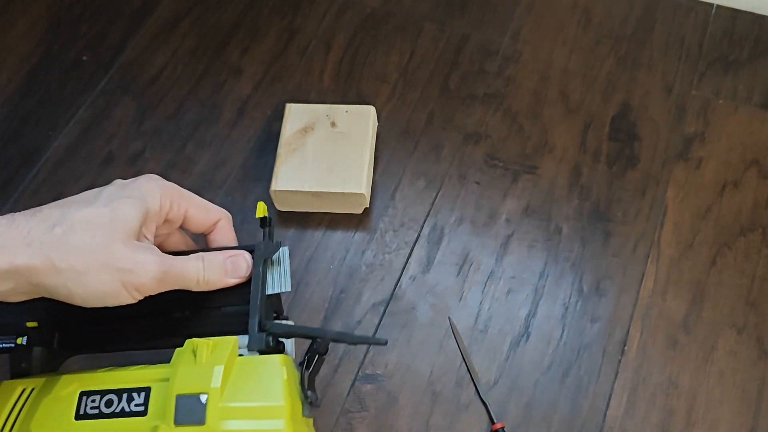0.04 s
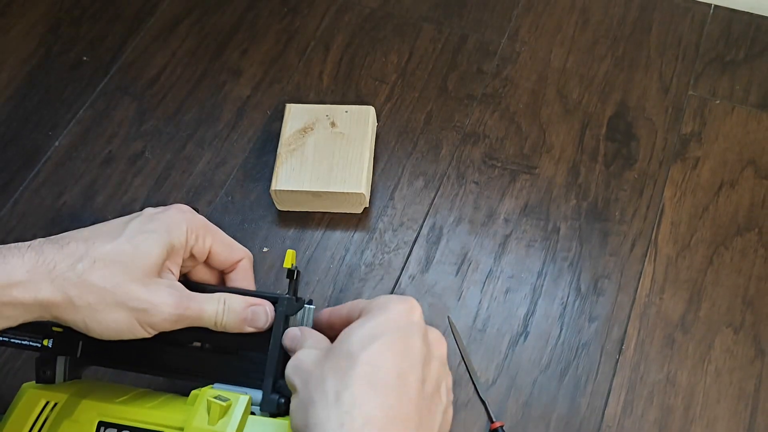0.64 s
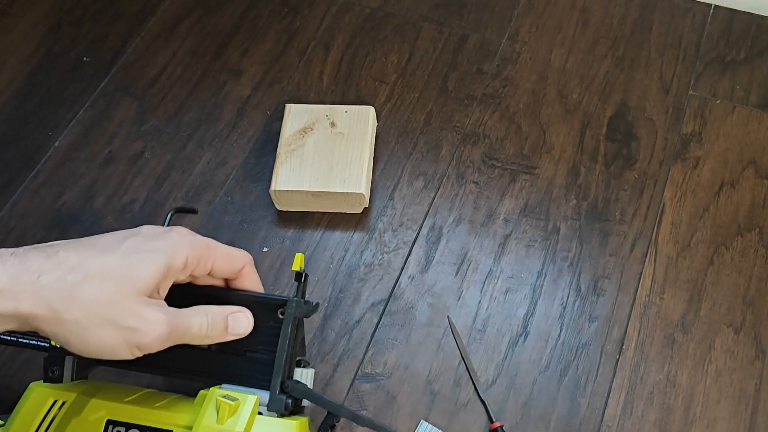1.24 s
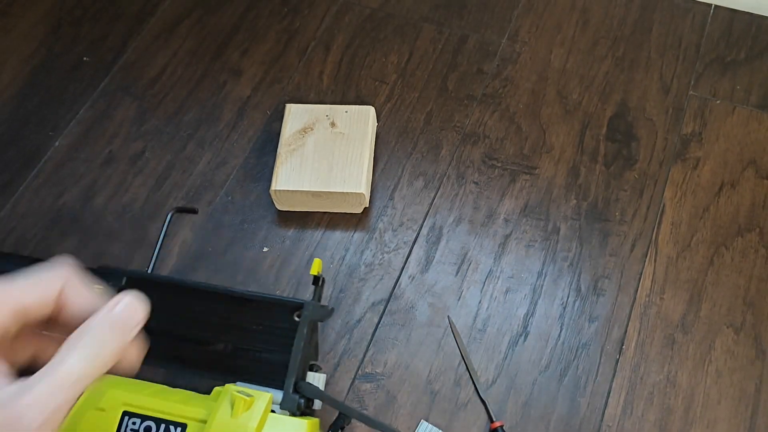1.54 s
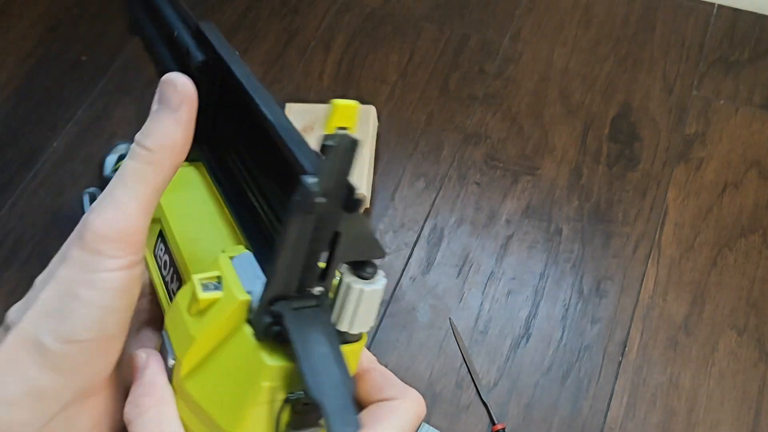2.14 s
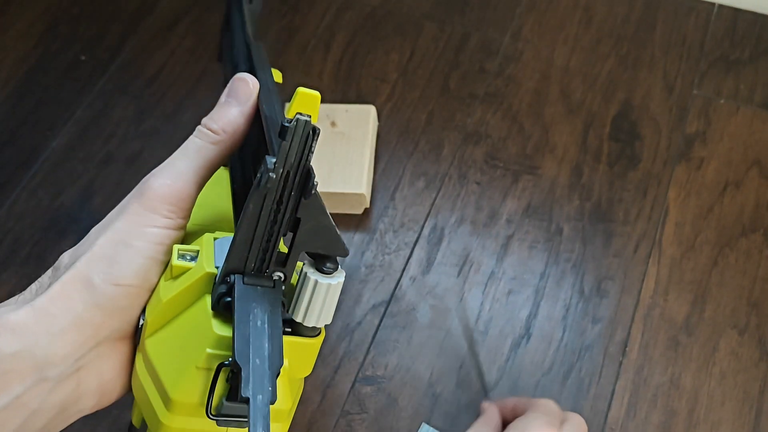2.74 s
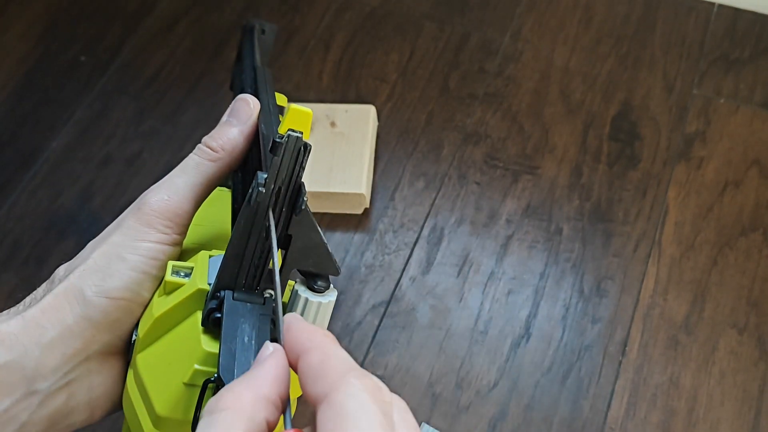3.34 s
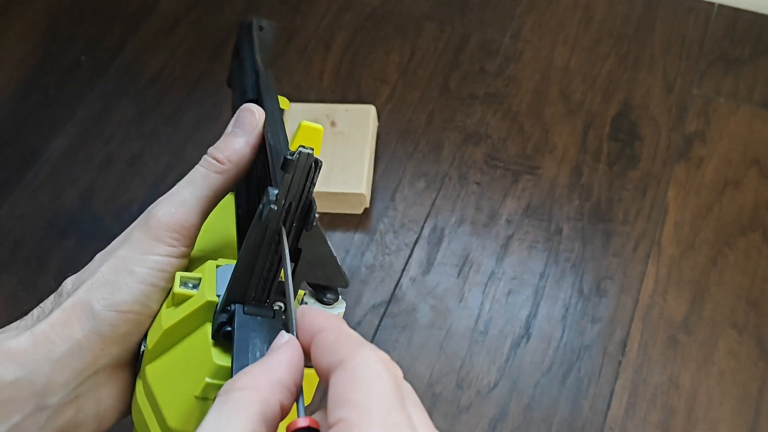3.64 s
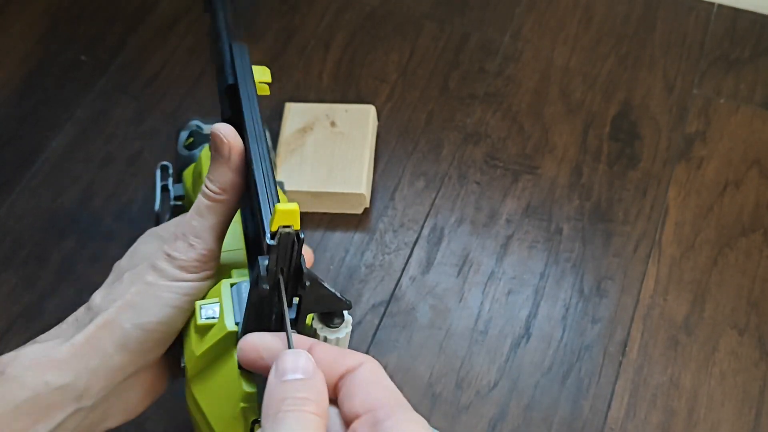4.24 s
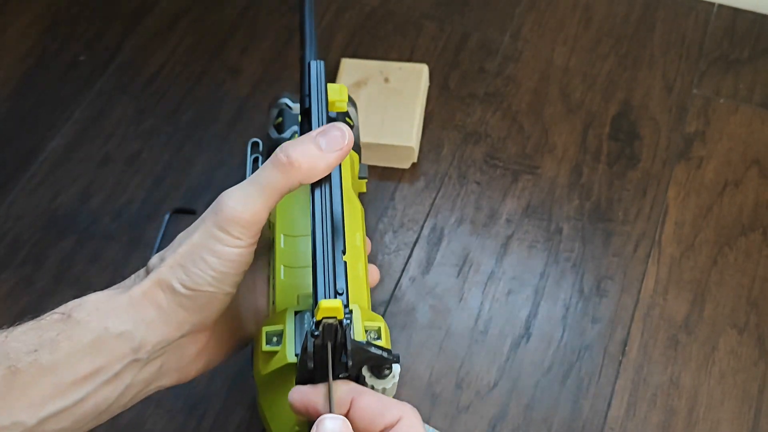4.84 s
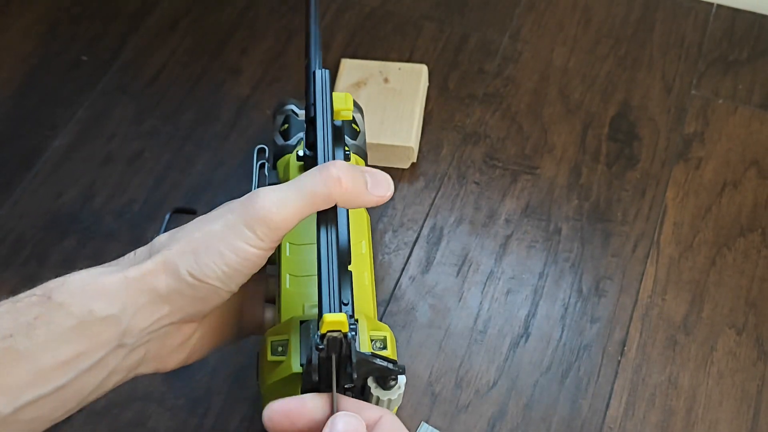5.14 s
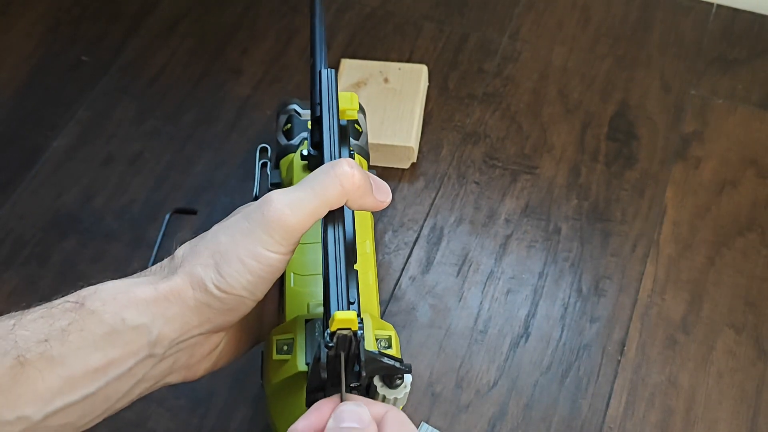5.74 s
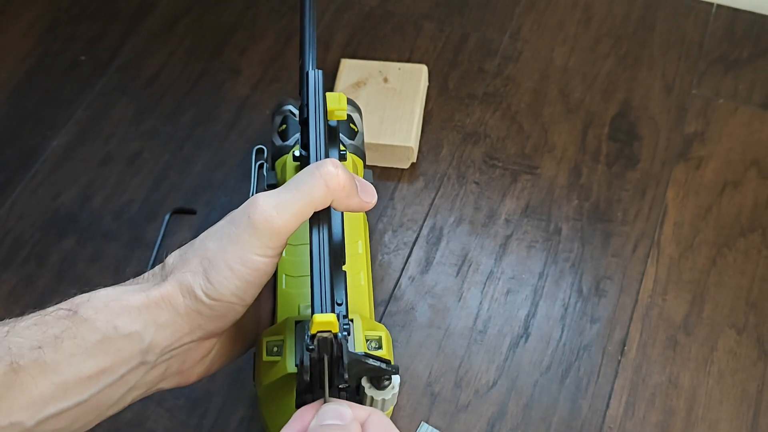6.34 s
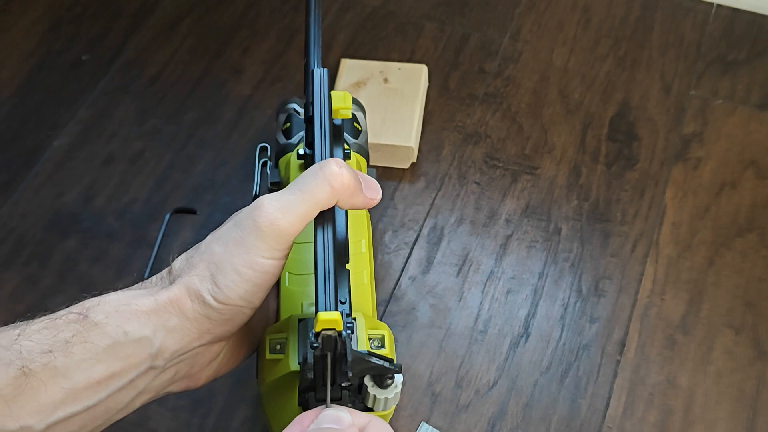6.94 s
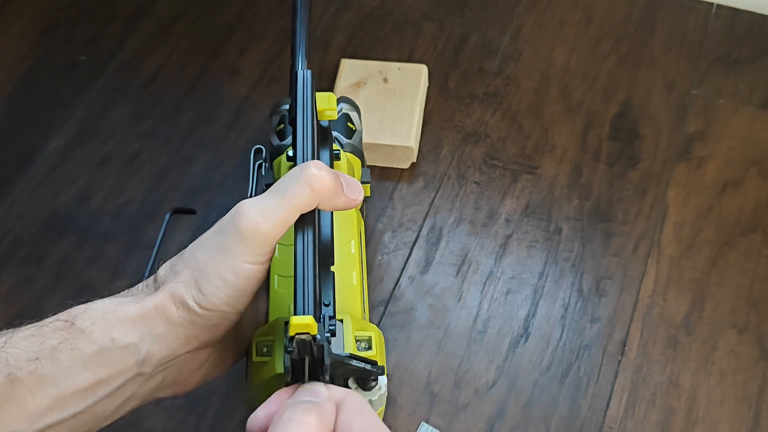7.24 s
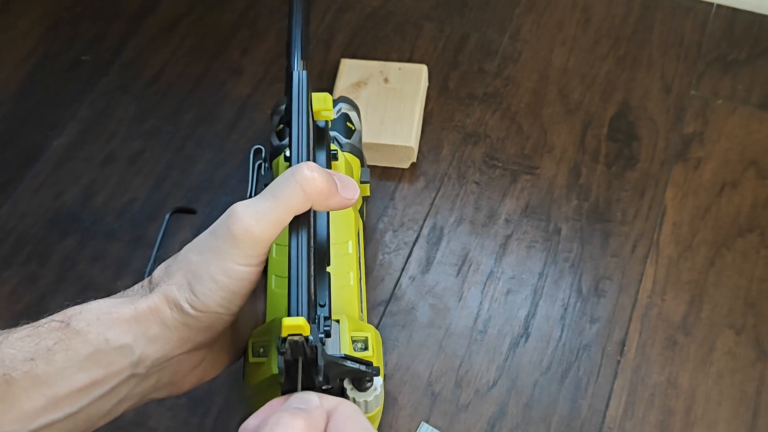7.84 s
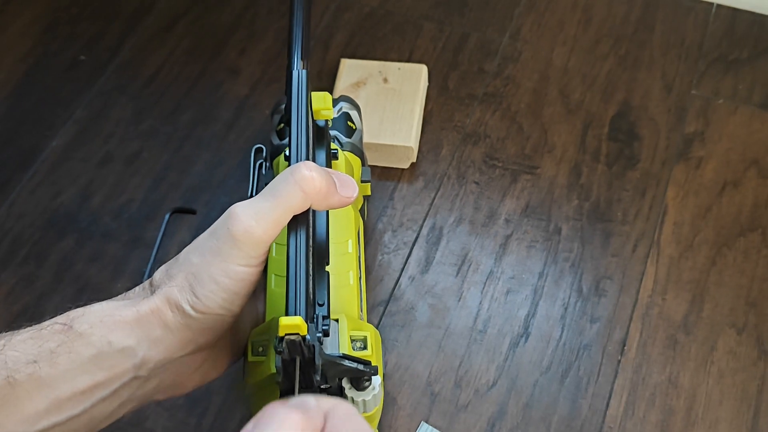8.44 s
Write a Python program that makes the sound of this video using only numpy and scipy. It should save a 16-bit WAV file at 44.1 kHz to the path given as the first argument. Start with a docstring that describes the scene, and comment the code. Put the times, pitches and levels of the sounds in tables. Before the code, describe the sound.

A nail gun is handled with thuds, clicks and sharp snaps, then a small metal file rasps inside it in quick strokes.

```python
"""A cordless nail gun handled on a wooden floor: hands slide on its shell, it bumps the boards,
parts click, the magazine latch snaps. A small metal file is picked up and rasps in the nose in
quick strokes that grow firmer; its teeth ring the steel and the push shakes the housing.
Close stereo microphone, quiet room, low hum."""
import sys
import numpy as np
from scipy import signal
from scipy.fft import rfft, irfft, next_fast_len
from scipy.io import wavfile

SR = 44100
rng = np.random.default_rng(int(sys.argv[2]) if len(sys.argv) > 2 else 0)


def output_pcm(signal):
    """Save a mono or channel-first signal as 16-bit PCM at the path in sys.argv[1].

    Samples are clipped to [-1, 1] before scaling.
    """
    pcm = np.clip(np.atleast_2d(signal).T, -1, 1) * 32767
    wavfile.write(sys.argv[1], SR, np.round(pcm).astype(np.int16))


N = 378241
TIME = np.arange(N) / SR

# machine hum: freq_hz, rms_db
HUM_TONES = [(58.2, -52), (99.7, -62.5), (176.5, -65.5)]
# rumble and hiss: freq_hz, gain_db
AMBIENT_SPECTRUM = [(20, -8.5), (38, -5.5), (70, -6), (110, -13), (250, -31), (850, -42), (1200, -49),
                    (4000, -50), (8000, -54.5), (16000, -54.5)]
# hands sliding on the shell: start_s, length_s, level_db, tilt_db_per_octave
HAND_RUBS = [(0, 0.19, -49, 4.5), (.16, .27, -50, 4), (.3, 0.11, -45.5, 2.5), (.6, 0.34, -52, 5),
             (1.37, 0.2, -42, 3), (1.8, 0.33, -56.5, 1.5), (2.15, .46, -54, 3.6), (4.36, 0.29, -46, 2.5),
             (4.63, 0.12, -47.5, 2)]
# skin friction: freq_hz, gain_db
SKIN_SPECTRUM = [(150, 0), (500, 5.5), (2000, -9), (4000, -7), (5400, -1), (8000, -24.5), (16000, -23.5)]
# plastic shell: freq_hz, gain_db
SHELL_MODES = [(560, 6), (740, 5), (960, 8), (1200, 6), (2200, 8), (2550, 5), (3750, 7)]
SHELL_WIDTH = .08  # share of centre frequency
# push of the hands on the gun: time_s, level_db
HAND_EFFORT = [(0, -67), (4.25, -58.5), (4.45, -46.5), (4.72, -43), (5.0, -96), (5.4, -62.5), (5.53, -45.5),
               (6.5, -46.5), (6.7, -39), (7.6, -39), (7.76, -33), (8.55, -34)]
# hand-held housing: freq_hz, gain_db
HOUSING_MODES = [(73.89, 0.5), (111.23, -2.5), (155, -3), (344.4, -8.5)]
# hard parts tapping the shell: start_s, level_db, centre_hz
PART_CLICKS = [(.398, -43.5, 3700), (.418, -47, 615), (.459, -39, 3560), (.484, -39, 4300),
               (.525, -48, 5400), (.769, -46.5, 4700), (.849, -38.5, 8600), (1.455, -36, 2220),
               (1.658, -46.5, 3260), (1.92, -41.5, 1344), (2.025, -50, 880), (2.113, -37.5, 2040),
               (2.161, -30.5, 1850), (2.175, -38.5, 3060), (2.21, -50, 1422), (2.308, -45, 2840),
               (2.333, -45, 3650), (4.377, -41.5, 945.4), (4.506, -41, 950), (4.644, -38.5, 730),
               (4.682, -41.5, 3240), (4.804, -20, 6970), (4.855, -41.5, 1165)]
# gun bumping on the floor and in the hand: start_s, peak_db, centre_hz
GUN_BUMPS = [(.456, -7, 161), (0.486, -22.5, 162), (1.117, -31, 410), (1.615, -30.5, 66.7),
             (2.164, -44.5, 500), (2.662, -33.5, 74.7), (2.97, -26.5, 45.2), (4.373, -27.5, 383),
             (4.387, -24.5, 296), (4.638, -16, 71), (4.770, -21, 256), (4.887, -19, 103),
             (5.545, -32.5, 74.5)]
# gun on the boards: freq_hz, gain_db, t60_s
FLOOR_MODES = [(40, -12.5, 0.95), (75.7, -1.5, 0.23), (151.4, 0, 0.08), (207, -7, 0.055),
               (303.8, -4.5, 0.09), (432, -21.5, 0.08)]
# latch release, stop and rebounds: start_s, level_db, centre_hz
LATCH_HITS = [(1.110, -27, 1370), (1.1162, -25, 2683), (1.124, -32.5, 3300), (1.151, -29, 15000),
              (1.157, -31, 15190), (1.158, -30.5, 3184), (1.185, -40, 1800)]
# latch spring steel: freq_hz, gain_db
SPRING_MODES = [(2250, -15), (3850, -15), (3975, -15), (4120, -15), (4630, -13), (4695, 1), (12850, -7),
                (12930, -10)]
# file dragged off the floor: start_s, length_s, level_db, tilt_db_per_octave
FLOOR_SCRAPES = [(2.70, 0.042, -47, 1.5), (2.81, .012, -55.5, 2.5)]
# file point on the guide plate: start_s, level_db, centre_hz
POINT_TICKS = [(3.532, -62.5, 6050), (3.759, -51.5, 2140), (3.829, -48, 5100), (3.849, -50.5, 4950),
               (3.886, -45.5, 1590), (4.045, -49.5, 1920), (5.098, -53.5, 3150), (5.556, -51.5, 2300),
               (6.118, -42, 4740), (7.142, -56.5, 1300), (8.027, -46.5, 1500), (8.051, -37.5, 1390),
               (8.345, -42.5, 1420), (8.366, -36, 1520)]
# thin guide plate at the muzzle: freq_hz, gain_db
GUIDE_MODES = [(1200, 10), (1390, 15), (2170, 11), (5400, 8)]
# file strokes, alternating in direction: start_s, length_s, level_db
FILE_STROKES = [(3.616, 0.07, -57.5), (3.762, 0.055, -56), (3.832, 0.049, -40.5), (4.049, 0.048, -34.5),
                (4.253, 0.022, -33.5), (5.033, 0.03154, -48), (5.38, 0.051, -56.5), (5.507, 0.072, -50.5),
                (5.702, 0.075, -53.5), (5.808, 0.11, -48), (5.987, 0.096, -43), (6.103, 0.096, -36.5),
                (6.28, 0.09085, -50.5), (6.381, 0.04391, -53.5), (6.532, 0.09, -47.5), (6.648, 0.1, -41),
                (6.806, 0.092, -42.5), (6.926, 0.1, -47.5), (7.253, .105, -35), (7.386, 0.12, -37),
                (7.538, 0.11, -36), (7.692, 0.13, -36), (7.858, 0.11, -35), (8.037, 0.094, -30.5),
                (8.161, 0.13, -35.5), (8.342, 0.09, -33.5), (8.469, 0.12, -29.5)]
# file on steel: freq_hz, gain_db
RASP_SPECTRUM = [(200, -28), (600, -10), (1100, -3), (3400, -5), (5400, 0.5), (9000, -5.5), (16000, -14.5)]
# nose and magazine: freq_hz, gain_db
NOSE_MODES = [(920, 12.5), (1240, 13.5), (1390, 9), (1880, 12.5), (2130, 11), (2380, 15), (2720, 10),
              (3020, 13), (3850, 8), (4200, 7.5), (4680, 7)]
# thin file tip: freq_hz, gain_db
TIP_MODES = [(4150, 4), (4750, 4), (5350, 3), (8420, -2)]
# magazine catch: freq_hz, level_db, t60_s
CATCH_RING = [(4570, -38, .2), (5130, -36.5, .2), (10070, -36.5, 0.25)]
# microphone response: freq_hz, gain_db
MIC_RESPONSE = [(4500, 0), (5800, 1), (6850, -12), (7800, -4), (10600, -.5), (11250, 4), (11800, -8),
                (13800, -7), (15600, 3)]


def undb(db):
    """Decibels to gain."""
    return 10 ** (np.asarray(db) / 20)


def unit(x):
    """Scale to rms 1."""
    return x / np.sqrt(np.mean(x ** 2) + 1e-20)


def fade(t, t60_s):
    """Exponential decay."""
    return np.exp(-np.log(1000) * t / t60_s)


def wander(count, rate_hz):
    """Smooth random motion, spread near 1."""
    return np.interp(TIME[:count] * rate_hz, np.arange(1024), rng.standard_normal(1024))


def panned(db):
    """Stereo gains for a left-minus-right level."""
    return undb(np.array([[db], [-db]]) / 2)


def add(out, start_s, sound):
    """Mix in at start_s."""
    start = max(int(start_s * SR), 0)
    part = sound[..., :max(N - start, 0)]
    out[..., start:start + part.shape[-1]] += part


def shape(x, gain):
    """Minimum-phase filter with magnitude gain(hz)."""
    count = x.shape[-1]
    size = 2 * next_fast_len(count // 2 + 4096)
    hz = np.arange(size // 2 + 1) * SR / size + 1e-3
    cepstrum = irfft(np.log(gain(hz) + 1e-6))
    cepstrum[1:size // 2] *= 2
    cepstrum[size // 2 + 1:] = 0
    return irfft(rfft(x, size) * np.exp(rfft(cepstrum)))[..., :count]


def spectrum(points):
    """Gain curve through (hz, db) points."""
    hz, db = np.transpose(points)
    return lambda f: undb(np.interp(np.log(f), np.log(hz), db))


def hump(hz, width):
    """Band-pass gain curve; width is a share of hz."""
    return lambda f: 1 / (1 + ((f / hz - hz / f) / width) ** 2)


def resonances(modes, width, base=1):
    """Gain curve of (hz, db) modes over a flat base."""
    return lambda f: np.sqrt(base + sum(undb(2 * db) * hump(hz, width)(f) for hz, db in modes))


def patchy(depth_db):
    """Gain curve with random peaks and dips."""
    hz = np.geomspace(500, 16000, 64)
    return spectrum(np.transpose([hz, depth_db * rng.standard_normal(len(hz))]))


def stereo_noise(count, apart_hz=1700):
    """Noise, alike in both channels below apart_hz, unrelated above."""
    mid, side = rng.standard_normal((2, count))
    side = shape(side, lambda f: f / np.hypot(f, apart_hz))
    return unit(np.array([mid + side, mid - side]))


def convolve(x, response):
    """Convolve with a response scaled to unit energy."""
    response = response / np.sqrt(np.sum(response ** 2, axis=-1, keepdims=True))
    return signal.fftconvolve(np.atleast_2d(x), response, axes=-1)[:, :N]


def excite(force, gain, t60_s=0.016):
    """A force rings a part's dense modes, coloured by gain."""
    t = TIME[:SR // 5]
    decay = fade(t, t60_s)
    response = stereo_noise(len(t), apart_hz=3053) * decay
    for _ in range(4):  # flatten the spectrum, restore a decay
        bins = rfft(response)
        response = irfft(bins / np.abs(bins), len(t)) * decay ** .25
    return convolve(force, shape(response, gain))


def ring(modes, chatter=0, chatter_hz=600):
    """Decaying (hz, db, t60_s) sines; a loose part's chatter roughens them."""
    t = TIME[:SR // 2]
    out = np.zeros(len(t))
    for hz, db, t60_s in modes:
        phase = 2 * np.pi * hz * t
        roughness = chatter * wander(len(t), chatter_hz) * np.cos(phase)
        out += undb(db) * fade(t, t60_s) * (np.sin(phase) + roughness)
    return out


def background(ambient_db=-53, drift_db=0.75):
    """Machine hum, building rumble, faint hiss."""
    hum = np.zeros(N)
    for hz, rms_db in HUM_TONES:
        amplitude = np.sqrt(2) * undb(rms_db + drift_db * wander(N, rate_hz=3.8))
        hum += amplitude * np.sin(2 * np.pi * (hz * TIME + rng.random()))
    return hum + undb(ambient_db) * unit(shape(stereo_noise(N), spectrum(AMBIENT_SPECTRUM)))


def effort_db(time_s):
    """Level at which the hands shake the housing."""
    return np.interp(time_s, *np.transpose(HAND_EFFORT))


def friction(strokes, tooth_hz=200, grit_db=0, waver_db=1.68, waver_hz=45, swell=.6, patchy_db=4):
    """Teeth catch at a rate set by stroke speed. Returns contact force, housing push, travel."""
    force, push, travel = np.zeros((3, N))
    for k, (start_s, length_s, db, tilt_db) in enumerate(strokes):
        count = max(int(length_s * SR), 64)
        speed = np.sin(np.pi * (np.arange(count) + .5) / count)
        catch_hz = speed * tooth_hz * undb(5 * wander(count, tooth_hz))  # uneven: teeth skip
        catches = np.diff(np.floor(np.cumsum(catch_hz / SR)), prepend=0)
        teeth = unit(catches * undb(4.2 * rng.standard_normal(count)))
        grit = undb(grit_db) * rng.standard_normal(count)
        bite = shape(teeth + grit, lambda f: undb(tilt_db * np.log2(np.maximum(f, 500) / 3000)))
        # the moving contact favours different modes at each end
        along = np.linspace(0, 1, count)
        near, far = shape(bite, patchy(patchy_db)), shape(bite, patchy(patchy_db))
        bite = unit((1 - along) * near + along * far)
        # stick-slip wavers most in light strokes
        lightness = min(db / -37, 1.4) ** 3
        pressure = speed ** swell * undb(waver_db * lightness * wander(count, waver_hz))
        shake = rng.standard_normal(count) * undb(effort_db(start_s + length_s / 2))
        add(force, start_s, bite * pressure * undb(db))
        add(push, start_s, shake * pressure)
        add(travel, start_s, (-1) ** k * np.cos(np.pi * along))
    return force, push, travel


def housing(push, width_hz=29):
    """The heavy housing rocks in the hand and booms."""
    response = shape(signal.unit_impulse(SR // 4),
                     lambda f: sum(undb(db) * hump(hz, width_hz / hz)(f) for hz, db in HOUSING_MODES))
    return convolve(push, response[None])


def hands():
    """Skin sticks and slips on the plastic shell."""
    force, push, _ = friction(HAND_RUBS)
    skin, shell = spectrum(SKIN_SPECTRUM), resonances(SHELL_MODES, SHELL_WIDTH)
    return excite(force, lambda f: skin(f) * shell(f), t60_s=0.048) + housing(push)


def strikes(hits, modes, rise_s=0.0036, rattle_t60_s=0.19, rattle_db=-20, graze_s=0.0034, graze_db=-16):
    """Two parts graze, then meet with a crack; the body rattles on."""
    out, t = np.zeros((2, N)), TIME[:SR // 4]
    after_s = np.maximum(t - graze_s, 0)
    graze = undb(graze_db) * t / graze_s * (t < graze_s)
    attack = 1 - np.exp(-after_s / rise_s)
    rattle = undb(rattle_db) * fade(after_s, rattle_t60_s)
    body = resonances(modes, SHELL_WIDTH)
    for start_s, db, centre_hz in hits:
        crack = fade(after_s, t60_s=0.029 * (1000 / centre_hz) ** 0.23)  # small parts stop sooner
        spot = patchy(depth_db=3)  # each spot favours its own modes
        burst = stereo_noise(len(t)) * (graze + (crack + rattle) * attack)
        click = shape(burst, lambda f: hump(centre_hz, width=1.63)(f) * body(f) * spot(f))
        add(out, start_s - graze_s, undb(db) * click / np.std(click[:, :SR // 50]))
    return out


def clicks():
    """Magazine and nails tap the shell."""
    return strikes(PART_CLICKS, SHELL_MODES, rise_s=0.0016)


def bumps(clatter_db=-6, clatter_t60_s=0.22, knock_lag_s=.003, knock_hz=1307.2):
    """The gun thuds on the boards; louder, harder contacts knock the shell more."""
    out, t, knocks = np.zeros((2, N)), TIME[:SR // 2], []
    for start_s, peak_db, centre_hz in GUN_BUMPS:
        noise = unit(shape(stereo_noise(len(t), apart_hz=901), hump(670, width=1.9)))
        clatter = undb(clatter_db) * noise * fade(t, clatter_t60_s)
        thud = shape(clatter - ring(FLOOR_MODES), hump(centre_hz, width=1.4))
        add(out, start_s, thud * undb(peak_db) / np.abs(thud).max())
        knock_db = -32.5 + 0.65 * peak_db + 5.5 * np.log2(centre_hz / 200)
        knocks.append((start_s + knock_lag_s, knock_db, knock_hz))
    return out + strikes(knocks, SHELL_MODES)


def latch(ring_gain_db=13, ring_t60_s=0.1):
    """The sprung latch snaps and rebounds; its loose steel clatters."""
    steel = np.zeros(N)
    modes = [(hz, db, ring_t60_s) for hz, db in SPRING_MODES]
    for start_s, db, centre_hz in LATCH_HITS:
        clatter = shape(ring(modes, chatter=.5), hump(centre_hz, width=1.0))
        add(steel, start_s, undb(db + ring_gain_db) * clatter)
    cracks = strikes(LATCH_HITS, SHELL_MODES, rise_s=0.00056, rattle_t60_s=.12)
    return cracks * panned(db=-3) + steel * panned(db=4)


def file_pickup(board_hz=1300):
    """The file drags softly on a floorboard."""
    force, _, _ = friction(FLOOR_SCRAPES)
    return excite(force, hump(board_hz, width=0.81))


def file_ticks():
    """The file's point taps the guide plate."""
    return strikes(POINT_TICKS, GUIDE_MODES, rise_s=.001)


def filing(seated_s=4.5, blade_hz=1250, reach=0.18, guide_cut_hz=1050, light_touch_db=-47, width=0.055):
    """File teeth ring the guide plate, then from seated_s the nose; the push shakes the housing."""
    strokes = []
    for start_s, length_s, db in FILE_STROKES:
        skim_db = db - effort_db(start_s + length_s / 2)
        tilt_db = 0.39 + 0.046 * skim_db  # per octave: skimming is bright, pressing dull
        strokes.append((start_s, length_s, db, tilt_db))
    force, push, travel = friction(strokes, tooth_hz=700, grit_db=-7, waver_db=2.2, waver_hz=130,
                                   swell=1.0, patchy_db=4.5)
    # echo from the tip: the blade's free length changes, so the colour glides
    echo_s = (1 + reach * travel) / blade_hz
    force = force + .09 * np.interp(TIME - echo_s, TIME, force)
    seated = force * (TIME >= seated_s)
    rasp, plate = spectrum(RASP_SPECTRUM), resonances(GUIDE_MODES, width)
    guide = excite(force - seated, lambda f: rasp(f) * plate(f) / np.hypot(1, (guide_cut_hz / f) ** 4))
    nose = excite(seated, lambda f: rasp(f) * resonances(NOSE_MODES, width)(f))
    tip_db = -3 - np.maximum(effort_db(TIME) - light_touch_db, 0)  # pressure mutes the tip
    tip = excite(seated * undb(tip_db), resonances(TIP_MODES, width, base=0))
    left, right = guide + nose + tip
    return np.array([left, np.roll(right, 5)]) + housing(push)  # arrives left first


def magazine_catch(start_s=4.804):
    """The catch rings as it shuts."""
    out = np.zeros(N)
    add(out, start_s, ring(CATCH_RING, chatter=.9))
    return out


def room(x, t60_s=0.27, treble_t60_s=0.14, wet_db=-10):
    """Short wall reverberation; treble dies first."""
    t = TIME[:SR // 2]
    low = shape(stereo_noise(len(t), apart_hz=250.5),
                lambda f: f / np.hypot(f, 350) / np.hypot(1, f / 5000))
    high = shape(stereo_noise(len(t)), lambda f: f / np.hypot(f, 7000))
    tail = low * fade(t, t60_s) + high * fade(t, treble_t60_s)
    onset = np.clip(t / 0.0038 - .5, 0, 1)
    return undb(wet_db) * convolve(x, tail * onset)


def scene():
    """Gun, hands and file in the room."""
    close = hands() + clicks() + bumps() + latch()
    close += file_pickup() + file_ticks() + filing() + magazine_catch()
    return close + room(close) + background()


def record(dry, bass_pan_db=-4.0, bass_hz=120, top_hz=15900):
    """Microphone: coloured treble, more bass on the right, steep top cut."""
    mic, channels = spectrum(MIC_RESPONSE), []
    for x, shelf_db in zip(dry, (bass_pan_db / 2, -bass_pan_db / 2)):
        channels.append(shape(x, lambda f: mic(f) * undb(shelf_db / (1 + (f / bass_hz) ** 4))))
    return signal.sosfilt(signal.ellip(10, .2, 80, top_hz, fs=SR, output="sos"), channels)


dry = scene()
out = record(dry)
output_pcm(out)
```